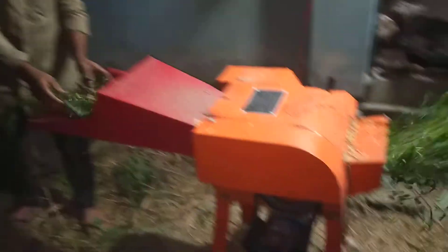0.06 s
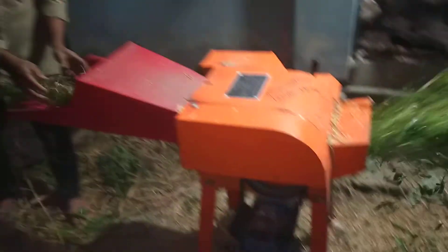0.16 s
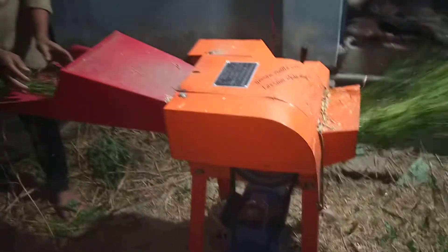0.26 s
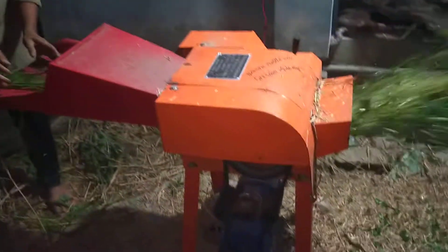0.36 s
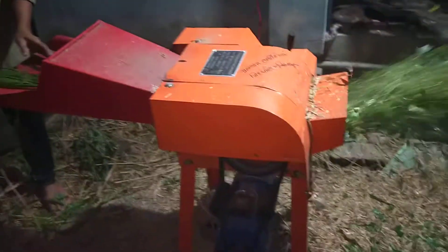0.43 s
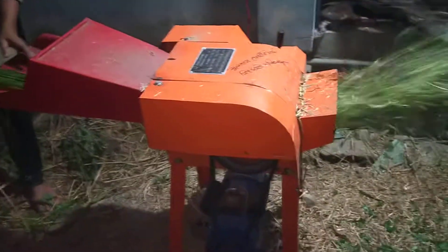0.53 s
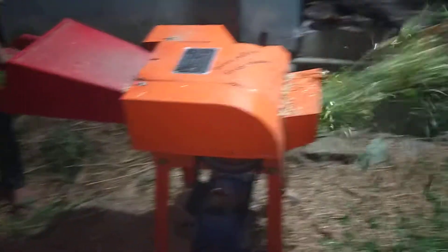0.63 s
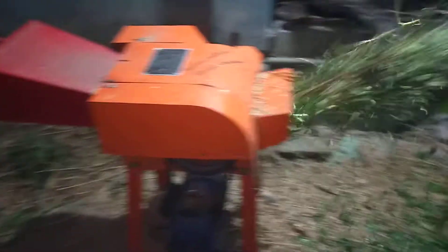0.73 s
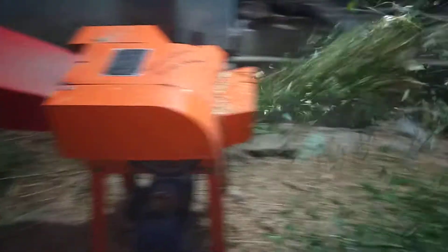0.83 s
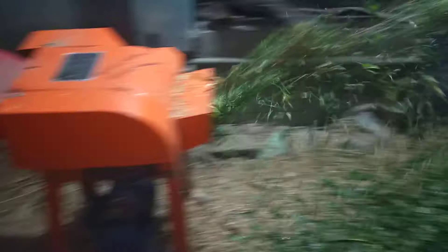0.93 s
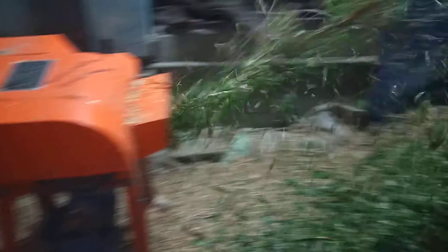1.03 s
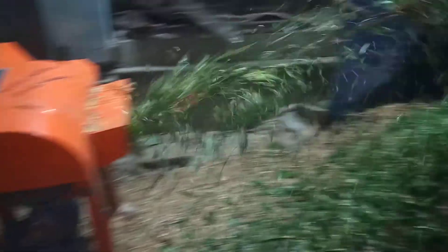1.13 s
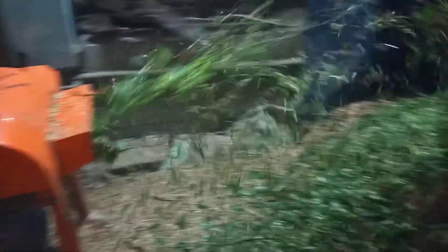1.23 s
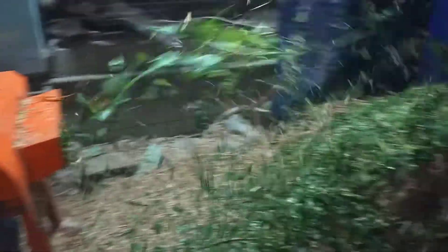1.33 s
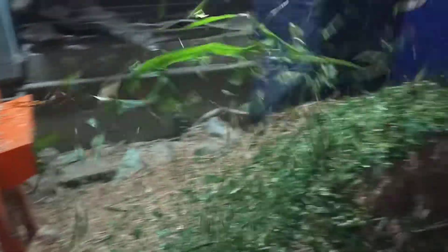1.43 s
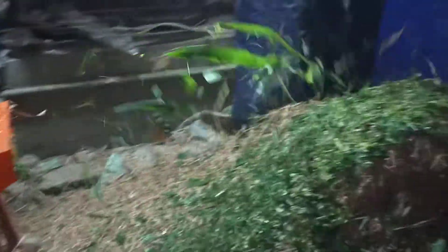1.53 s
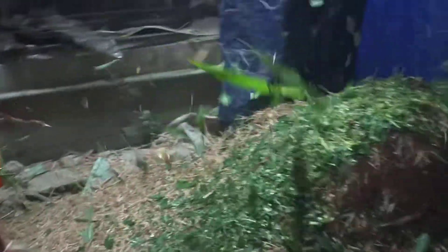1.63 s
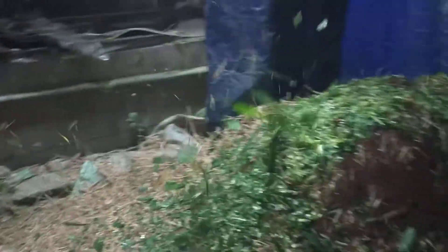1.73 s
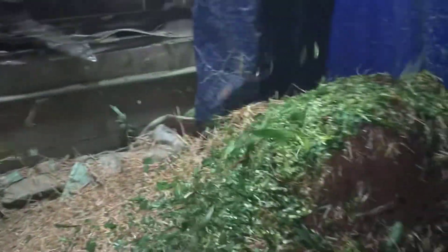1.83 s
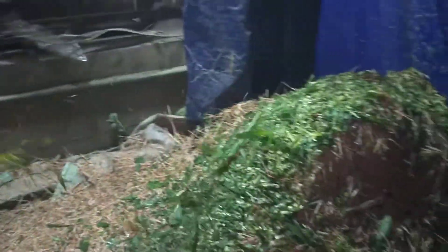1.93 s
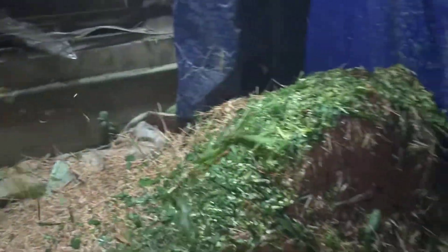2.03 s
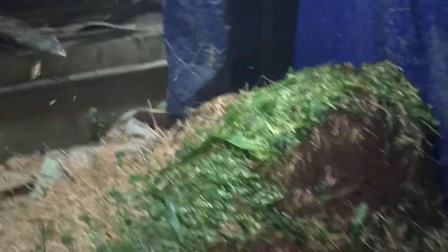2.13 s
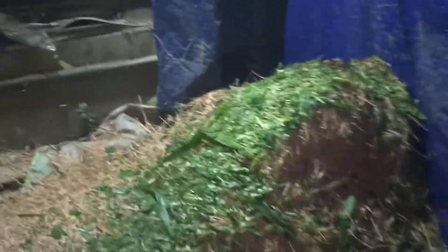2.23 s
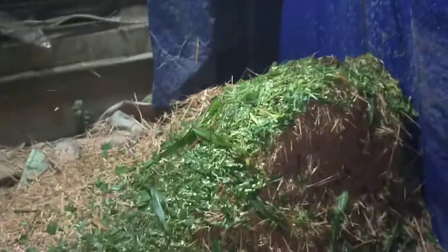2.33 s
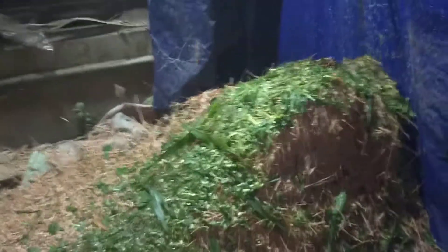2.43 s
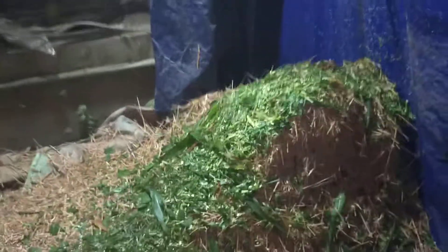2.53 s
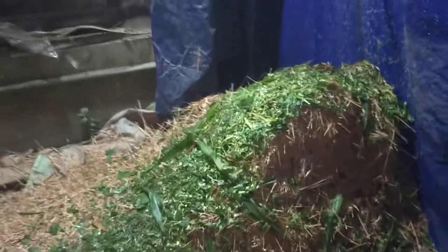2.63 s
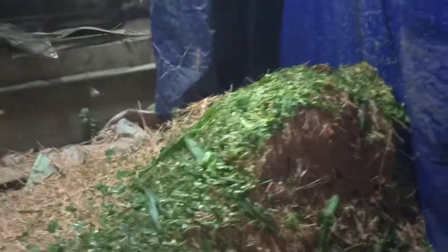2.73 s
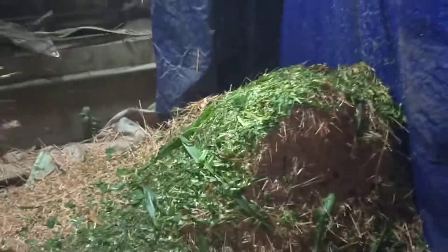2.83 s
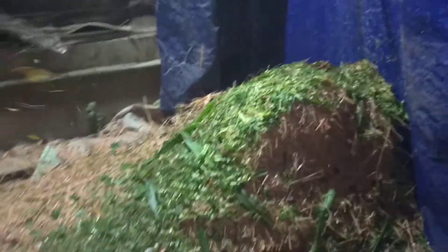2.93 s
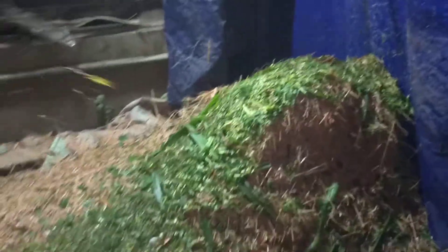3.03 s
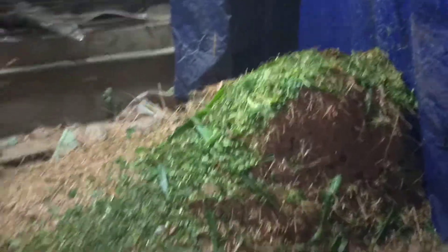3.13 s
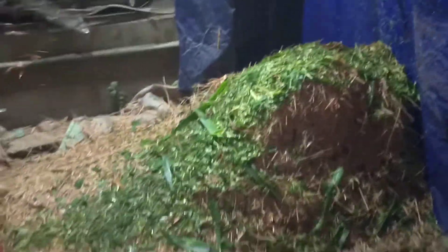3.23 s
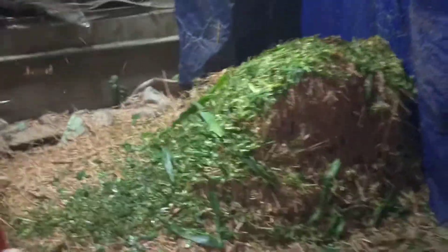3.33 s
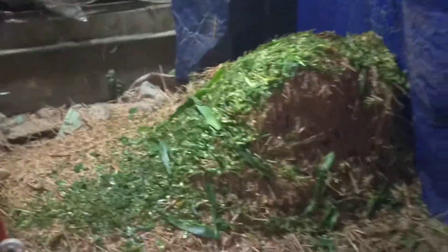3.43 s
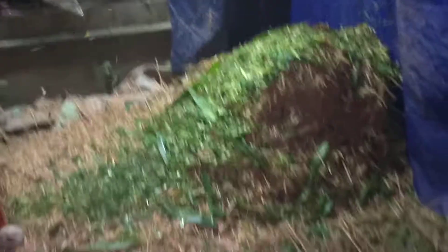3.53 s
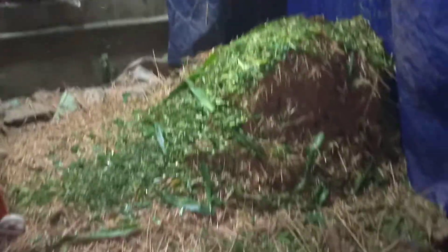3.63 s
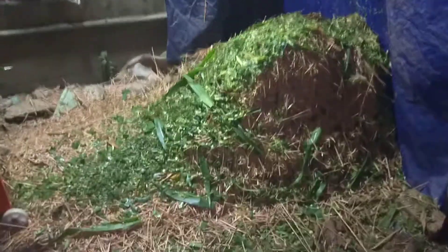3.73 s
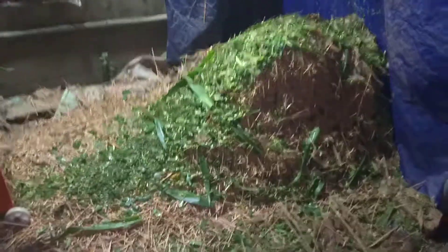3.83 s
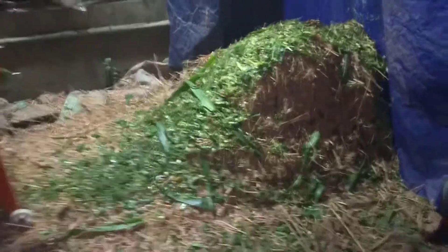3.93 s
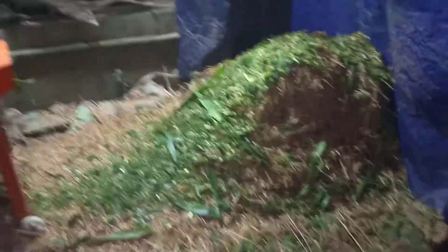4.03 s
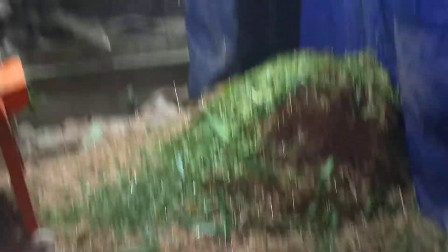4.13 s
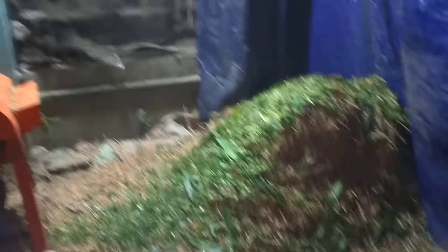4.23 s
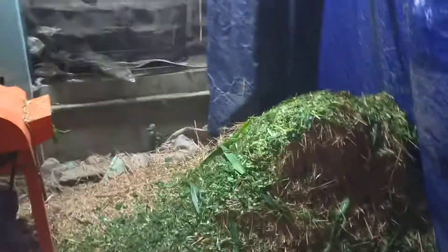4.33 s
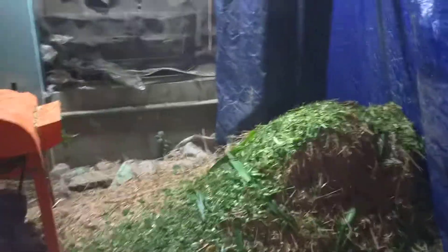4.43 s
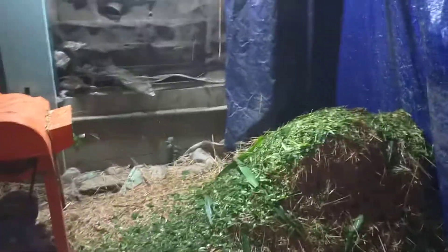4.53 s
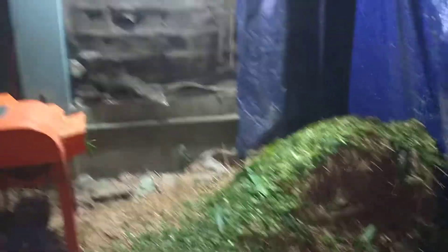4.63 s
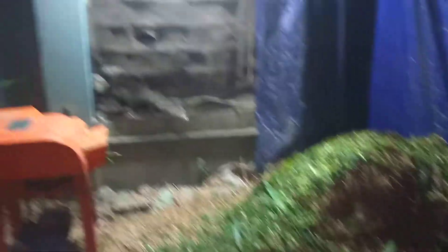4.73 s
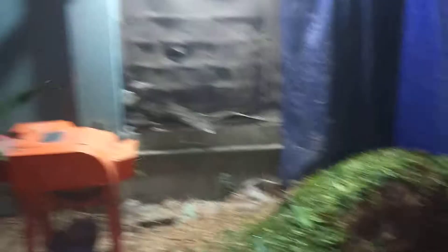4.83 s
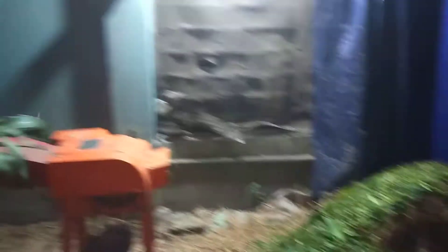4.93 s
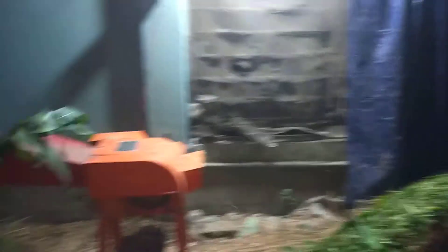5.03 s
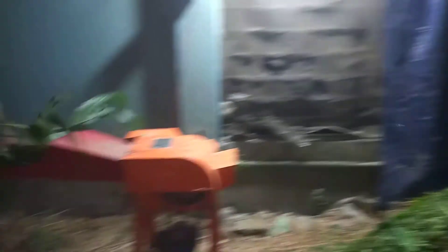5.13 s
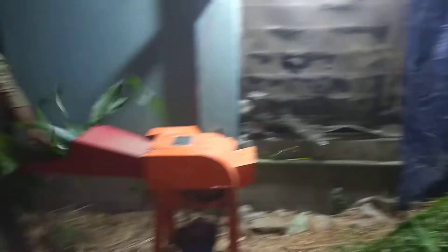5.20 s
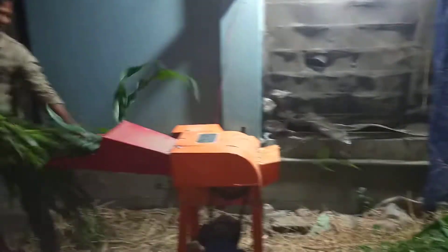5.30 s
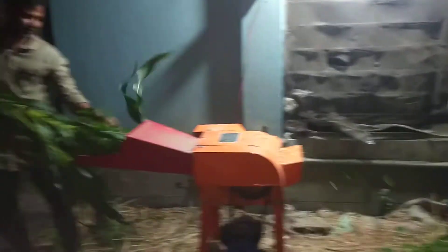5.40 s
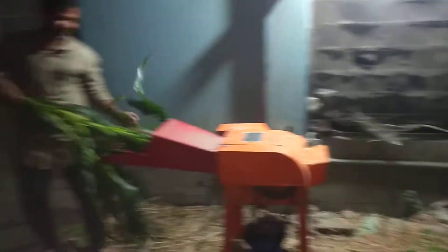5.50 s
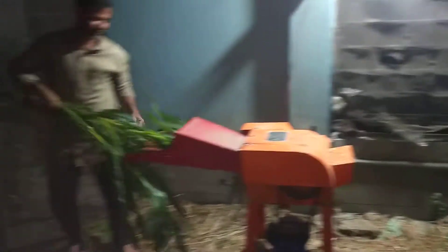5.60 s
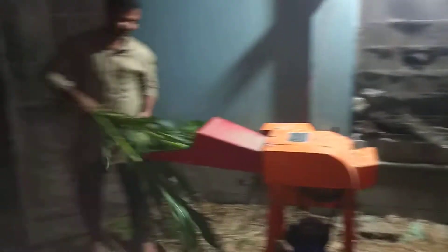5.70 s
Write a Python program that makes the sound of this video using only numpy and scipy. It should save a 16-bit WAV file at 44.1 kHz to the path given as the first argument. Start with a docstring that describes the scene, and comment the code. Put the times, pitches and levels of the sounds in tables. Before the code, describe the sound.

In a farm shed, an electric chaff cutter chops the end of a bundle of green fodder with a loud, droning buzz, crunching stalks and hissing chaff. After about a second the drum runs empty and slightly faster, churning air with a hollow whir and a faint whine. Loose steel parts rattle rapidly, with scattered pings and sharp cracks. The machine fades a little as the microphone moves away.

```python
"""A farm shed, where an electric chaff cutter's four-bladed drum chops the end of a bundle of green fodder.
The blows buzz in the sheet-steel hood, stalks crunch and chaff sprays out of the chute.
After a second the drum runs empty, a little faster, churning air while loose steel parts rattle once a turn.
Hard bits ping, sharp cracks top hard rattles, and the machine grows fainter as the listener steps away."""
import sys
import numpy as np
from scipy import signal
from scipy.fft import rfft, irfft
from scipy.io import wavfile
from scipy.ndimage import uniform_filter1d

SR = 44100
rng = np.random.default_rng(int(sys.argv[2]) if len(sys.argv) > 2 else 0)


def transcribe(signal):
    """Save signal, clipped to [-1, 1], as a 16-bit WAV file at the path in sys.argv[1]."""
    frames = np.atleast_2d(signal).T
    limited = np.clip(frames, -1, 1)
    pcm = np.round(limited * 32767).astype(np.int16)
    wavfile.write(sys.argv[1], SR, pcm)


N = 254016
TIME = np.arange(N) / SR
BLADES = 4
SHED_T60_S = 0.29
FADE_DB_PER_S = 0.8  # air and rattles recede as the listener steps away

# Resonances of the steel parts. Each row: centre in Hz, width in Hz, boost in dB.
STEEL_PEAKS = [(1154, 37, 3), (1657, 100.6, 5), (2224, 210, 4), (2630, 62, 2), (4050, 270, -5),
               (5600, 160, 4.5), (6730, 48, 10), (7220, 160, 10), (8360, 600, 7.5)]
# Tone of the rattles' bright edge. Each row: frequency in Hz, gain in dB.
EDGE_EQ = [(1500, -7.5), (3500, 12.5), (5000, 1.5), (6200, -4), (7300, 2), (8600, 4), (9400, -5.5),
           (12000, -12), (13000, -4), (14200, -3), (15600, 1.5)]


def chopping(blade):
    """Blades shear the bundle: the bite buzzes and thuds in a droning hood, stalks crunch, chaff sprays."""
    # The bundle in the drum. Each row: time in seconds, force of the bite in dB, flow of fodder in dB.
    feed = [(0, 1, 2), (.2, 0.5, 0.5), (.35, -1.5, 0), (.5, -2.5, 0.5), (.66, 1, -0.5), (.77, -9, 0.5),
            (.84, -16, -2), (.95, -24, -7), (1.07, -48, -13.5), (1.15, -56, -10.5), (1.21, -19, -7.5),
            (1.33, -39, -13.5), (1.5, -55.5, -20.5), (2.0, -57.5, -29.5), (5.76, -57.5, -27.5)]
    # The hood's drone. Each row: time in seconds, then levels in dB at 2, 3 and 4 times the blade rate.
    drone_levels = [(0, -28.5, -24, -20), (.15, -32.5, -29, -21.5), (.32, -39, -29.5, -26),
                    (.39, -38.5, -34, -26), (.45, -40, -32, -29.5), (.54, -44, -32, -26.5),
                    (.59, -43, -34, -22), (.68, -39.5, -45, -20.5), (.765, -69, -44, -25),
                    (.8, -63, -50, -40), (.83, -66, -51, -28.5), (.95, -72, -50, -45),
                    (1.1, -79.5, -80, -80)]
    # Tone of the hood's buzz, the thuds, the stalks and the chaff. Each row: frequency in Hz, gain in dB.
    buzz_eq = [(40, -40), (80, -39.5), (165, -24.5), (240, -13), (322, -16.5), (400, -6.5), (482, -6.5),
               (563, -9.5), (643, -8.5), (724, -11.5), (800, -15.5), (880, -13), (1150, -23.5), (1500, -23),
               (2200, -31.5), (7000, -66)]
    thud_eq = [(40, -41), (70, -49), (120, -22), (190, -8.5), (255, -3), (305, 3.5), (390, -0.5),
               (460, -6.5), (700, -13.5), (1100, -25.5), (2500, -52)]
    crunch_eq = [(50, -36), (300, -31), (550, -5), (880, 5), (1100, 2), (1400, -2), (1900, -2), (2350, -3),
                 (3000, -9.5), (4000, -18), (6000, -25), (12000, -26.5)]
    spray_eq = [(2000, -16), (3500, 3), (5200, -1.5), (6300, 3.5), (7700, 2.5), (8600, 5), (10000, -3),
                (12000, -13), (14000, -3), (15600, 2.5)]
    bite_db, flow_db = curves(feed)
    blows = colour(cuts(blade, uneven_db=0.5, scatter_db=0.5), buzz_eq)
    buzz = unit(bending(blows, delay_s=0.028, at_hz=320)) * undb(-27 + bite_db)
    drone = tones(blade, enumerate(curves(drone_levels), 2), waver_db=1.1, slip_rad=0.05)
    thick_db = 3 * swell(0.65, half_s=0.098)  # a thick part of the bundle goes through
    pounding = rng.standard_normal(N) * strokes(blade, decay_cycles=1.65, scatter_db=0.5)
    thud = colour(pounding, thud_eq) * undb(-26 + 0.36 * bite_db + thick_db)
    stalks = clicks(6000, spread_db=2) * strokes(blade, decay_cycles=9.1, scatter_db=0.85)
    crunch = reverb(colour(stalks, crunch_eq, STEEL_PEAKS), wet_db=-10.5) * undb(-30.5 + flow_db)
    chaff = clicks(9000, spread_db=2.5) * strokes(blade, decay_cycles=4.2, scatter_db=2)
    spray = reverb(colour(chaff, spray_eq), wet_db=-8) * undb(-41.5 + flow_db)
    return buzz + drone + thud + crunch + spray


def cuts(blade, uneven_db, scatter_db):
    """One sharp push per blade pass; one side of the drum bites harder, and no two cuts are alike."""
    at = np.flatnonzero(np.diff(blade.astype(int)))
    lopsided_db = uneven_db * np.cos(2 * np.pi * blade[at] / BLADES)
    pushes = np.zeros(N)
    pushes[at] = undb(lopsided_db + scatter_db * rng.standard_normal(len(at)))
    return pushes


def bending(x, delay_s, at_hz):
    """Bending waves in sheet steel: the lows travel slower than the highs, which smears each blow."""
    f = np.fft.rfftfreq(N, 1 / SR)
    return irfft(rfft(x) * np.exp(-4j * np.pi * delay_s * np.sqrt(at_hz * f)), N)


def churned_air(blade):
    """The blades churn air in the hood: a pattern that repeats every turn, under random turbulence."""
    # The hood's hollow note as the moving listener hears it. Each row: time in seconds, pitch in Hz.
    hood_note = [(0, 326), (2.6, 326), (3.3, 349), (3.75, 373), (4.1, 304), (4.4, 397), (4.85, 386.7),
                 (5.2, 341), (5.76, 303)]
    # Tone of the air with that note at 340 Hz. Each row: frequency in Hz, gain in dB.
    air_eq = [(30, -85), (60, -79), (90, -22), (130, -19.5), (200, -8.5), (265, -4.5), (345, 1.5),
              (430, -5.5), (560, -13.5), (750, -20.5), (1500, -20.5), (5000, -47)]
    hood_hz, = curves(hood_note)
    surge_db, _ = surges()
    one_turn = rng.standard_normal(SR // 21)
    repeating = one_turn[(blade / BLADES % 1 * len(one_turn)).astype(int)]
    turbulence = undb(6) * rng.standard_normal(N)
    churn = (repeating + turbulence) * strokes(blade, decay_cycles=2.1, scatter_db=1.1)
    # Crossfading three transposed EQs makes the note slide.
    notes_hz = [290, 340, 400]
    air = sum(np.interp(hood_hz, notes_hz, share) * colour(churn, np.array(air_eq) * [hz / 340, 1])
              for hz, share in zip(notes_hz, np.eye(3)))
    return unit(air) * undb(-39 - FADE_DB_PER_S * TIME + surge_db)


def drum_tones(blade):
    """The spinning drum hums and whines, loudest in front of the chute."""
    # Partials of the hum and the whine. Each row: multiple of the blade rate, relative level in dB.
    hum_partials = [(2.94, -54), (3.5, -51), (4, -55), (4.19, -52.5), (5, -57.5), (8, -63)]
    whine_partials = [(7, -1), (7.27, -6.5)]
    # Their fader rides. Each row: time in seconds, gain in dB.
    hum_fader = [(0, 8), (.7, 8), (.85, 13.5), (.97, 8), (1.08, 4.5), (1.9, 1.5), (2.4, 6), (2.8, 4),
                 (3.3, -1.5), (5.76, -9.5)]
    whine_fader = [(0, -64), (.7, -50), (.8, -45), (.97, -43), (1.1, -49), (1.25, -48), (1.6, -53.5),
                   (2.1, -58), (2.28, -53), (2.45, -56), (2.65, -53), (3.2, -61), (5.76, -69)]
    hum = tones(blade, hum_partials, waver_db=2, slip_rad=0.35) * undb(curves(hum_fader)[0])
    whine = tones(blade, whine_partials, waver_db=3.5, slip_rad=0.58) * undb(curves(whine_fader)[0])
    return hum + whine


def drive(turn):
    """The drive's loose steel parts rattle in clusters of clicks that ring their modes and shake chaff."""
    # Tone of the rattles' dull body. Each row: frequency in Hz, gain in dB.
    body_eq = [(50, -65), (300, -13.5), (600, 0), (760, -1), (950, 4), (1350, -1.5), (1900, 2.5), (2350, 3),
               (2800, -1.5), (3200, -5.5), (4000, -14), (5000, -20.5), (8000, -30), (12000, -47)]
    # Modes of the loose parts. Each row: frequency in Hz, relative level in dB.
    modes = [(1130, 2), (1660, 5.5), (1960, 7), (2080, 1.5), (2240, 5.5), (2690, -2), (2760, 3), (4080, -8),
             (6630, -10.5), (7100, -12), (8100, -11), (8450, -12)]
    # One part jingles along for a while. Each row: crest and half length in seconds, pitch in Hz, gain in dB.
    jingles = [(2.76, 0.12, 2480, -8), (4.3, 0.11, 2410, -7), (4.745, 0.4, 4045, -19),
               (5.15, .08, 2780, -10), (5.393, 0.035, 2260, -4)]
    body, edge = rattle_envelopes(turn)
    low = colour(clicks(5000, spread_db=2.5) * body, body_eq, STEEL_PEAKS)
    high = colour(clicks(3500, spread_db=4.5) * edge, EDGE_EQ, STEEL_PEAKS) * undb(-1)
    chaff = chaff_ticks() * edge * undb(-7.5)
    # Each mode is struck at its own moments, so no two rattles have the same colour.
    ringing = sum(undb(db - 18) * struck(clicks(160, spread_db=2.5) * body, hz, t60=0.067)
                  for hz, db in modes)
    jingle = sum(undb(db) * struck(clicks(300, spread_db=3.5) * body * swell(s, half_s), hz, t60=0.054)
                 for s, half_s, hz, db in jingles)
    return reverb(low, wet_db=-6.5) + reverb(high, wet_db=-4.5, t60=0.03) + ringing + jingle + chaff


def rattle_envelopes(turn, at_turn=0.36, stray_turns=0.18, scatter_db=3):
    """Envelopes of the drive's dull body and bright edge: chatter, a rattle each turn, some hard ones."""
    # Hard rattles that stand out. Each row: time in seconds, relative levels of edge and body in dB.
    hard_rattles = [(1.111, -46.5, -37), (1.196, -41, -38), (1.251, -43, -37), (1.332, -51, -39),
                    (1.433, -47, -46), (1.543, -49, -42), (1.585, -47, -46), (1.622, -51, -52),
                    (1.73, -59, -42), (1.926, -53, -41), (1.975, -52, -43), (2.117, -51.5, -36),
                    (2.213, -44, -34), (2.303, -52, -38), (2.34, -49.5, -39), (2.398, -58, -41),
                    (2.486, -51, -36.5), (2.548, -49, -36.5), (2.606, -51, -37), (2.684, -49, -35.5),
                    (2.742, -49.5, -39), (2.775, -55, -42), (2.832, -49, -42), (2.877, -49, -37.5),
                    (2.974, -50.5, -38.0), (3.079, -51, -39), (3.114, -47.5, -39), (3.198, -53, -37),
                    (3.3, -60, -41.5), (3.345, -53, -43), (3.436, -51, -40), (3.509, -53.0, -38.5),
                    (3.551, -53, -40), (3.641, -50.5, -41.5), (3.706, -45, -34), (3.743, -47, -39),
                    (3.779, -57, -39), (3.828, -54, -44), (3.931, -49, -40), (3.976, -54, -46),
                    (4.078, -47.5, -41), (4.121, -49, -39), (4.163, -53, -37), (4.205, -52, -41),
                    (4.532, -51, -40.5), (4.597, -50, -44.5), (4.683, -53.0, -43), (4.731, -54, -46),
                    (4.794, -54, -40.5), (4.854, -57, -40.5), (4.93, -54, -45), (5.074, -50, -38),
                    (5.171, -50.5, -46), (5.405, -54, -41), (5.452, -49, -46), (5.528, -49, -40),
                    (5.643, -52, -52), (5.725, -46, -42)]
    _, surge_db = surges()
    shake_db = surge_db - FADE_DB_PER_S * TIME + wander(14)
    stray, strength = rng.standard_normal((int(turn[-1]), 2)).T
    rattle_s = np.interp(np.arange(len(stray)) + at_turn + stray_turns * stray, turn, TIME)
    rattles = bursts(rattle_s, scatter_db * np.minimum(strength, 1))
    chatter = strokes(turn + 1 - at_turn, decay_cycles=1.8, scatter_db=0.7) ** 2
    # The layers add as powers.
    body = chatter * undb(-45 + shake_db) ** 2 + rattles * undb(-37.5 + shake_db) ** 2
    edge = chatter * undb(-57.5 + shake_db) ** 2 + rattles * undb(-47 + shake_db) ** 2
    hard_s, edge_db, body_db = np.transpose(hard_rattles)
    body += bursts(hard_s, body_db + 3)
    edge += bursts(hard_s, edge_db + 4.5, rise_s=0.003)  # a sharper attack than the body's
    return np.sqrt(body), np.sqrt(edge)


def surges():
    """The empty machine shakes harder or eases off for a moment: gains in dB for air and drive."""
    # Swells and lulls. Each row: crest and half length in seconds, gains of air and drive in dB.
    swings = [(1.39, .02, 1.5, -8), (1.47, 0.018, 1, -5), (1.8, .012, -3, -4), (2.01, 0.014, 0, -7),
              (2.17, .035, -3.5, -4.5), (2.394, 0.14, 2, 2.5), (2.45, 0.029, -1.5, -7.5),
              (2.673, .012, -3, -6), (2.719, 0.084, 4, 4), (3.16, 0.018, 2.5, -8), (3.245, 0.028, -1.5, -7),
              (3.408, 0.025, -4, -6), (3.68, .012, 2, -9), (3.75, 0.063, 6, 4.5), (4.173, 0.035, 3, -1),
              (4.278, 0.026, -4, 1), (4.466, 0.041, -1.5, -3), (4.814, 0.062, 0.5, -1.5),
              (4.915, .012, -1, -6), (4.981, 0.05, 6, 2.5), (5.048, 0.028, 1.5, -11), (5.244, 0.019, 1, -7),
              (5.489, 0.016, -1, -3), (5.69, 0.019, 0, -6)]
    return sum(np.outer(gains_db, swell(s, half_s)) for s, half_s, *gains_db in swings)


def clinks():
    """Single hard bits each set a close, beating pair of the steel's modes ringing."""
    # Hits on the steel. Each row: start in seconds, pitch in Hz, peak of the main mode in dB.
    hits = [(0.79, 2630, -31), (1.194, 2006, -34.5), (1.284, 2240, -35), (1.289, 3290, -43),
            (1.297, 1720, -39), (1.333, 1980, -36.5), (2.219, 1986, -36), (2.22, 6990, -47),
            (2.311, 7105, -52), (2.549, 2756, -43), (2.684, 3544, -50), (2.69, 3300, -51),
            (3.742, 2780, -39), (3.746, 3850, -49), (3.786, 2700, -42), (4.122, 2700, -48),
            (4.315, 4100, -53), (4.598, 4090, -54), (4.681, 4110, -53), (4.735, 4170, -55),
            (4.765, 4070, -55), (4.796, 3350, -50)]
    out = np.zeros(N + SR)
    for s, hz, db in hits:
        partner = undb(-9) * ring(hz + rng.uniform(-61, 70), t60=0.071)
        ping = undb(db) * (ring(hz, t60=0.088) + partner)
        out[int(s * SR):][:len(ping)] += ping
    return out[:N]


def sharp_cracks():
    """Short, bright cracks, most at the start of a hard rattle."""
    # The cracks. Each row: time in seconds, relative level in dB.
    cracks = [(1.186, -38), (1.548, -46), (2.215, -47), (2.684, -44), (2.724, -44), (2.752, -50),
              (2.779, -42.5), (2.838, -48), (3.021, -45.5), (3.114, -48), (3.199, -49), (3.699, -42.5),
              (3.716, -46), (3.746, -42), (3.762, -50), (3.834, -45), (3.982, -46), (4.085, -48),
              (4.168, -49), (4.535, -48), (4.603, -46), (4.735, -48), (4.934, -43), (5.072, -51),
              (5.319, -48), (5.726, -49)]
    # Tone of a crack. Each row: frequency in Hz, gain in dB.
    crack_eq = [(1500, -10), (2800, -1), (4500, -4), (6000, -5), (8500, 0), (11800, -15), (13200, -8),
                (15600, 0.5)]
    envelope = np.sqrt(bursts(*np.transpose(cracks), rise_s=0.002, fall_s=0.01))
    return colour(clicks(7000, spread_db=3) * envelope, crack_eq)


def chaff_ticks(per_s=900, low_hz=5714, high_hz=15200, t60=0.025, scatter_db=2.5):
    """Bits of chaff shower against the steel, each ringing briefly at its own pitch; rms 1."""
    out = np.zeros(N + SR)
    age = TIME[:SR // 25]
    decay = undb(-60 * age / t60)
    for when, pitch, size in rng.random((int(per_s * N / SR), 3)):
        hz = low_hz * (high_hz / low_hz) ** pitch
        strength = undb(-scatter_db * np.log(max(size, 0.05)))
        out[int(when * N):][:len(age)] += strength * np.sin(2 * np.pi * hz * age) * decay
    return unit(colour(out[:N], EDGE_EQ))


def reverb(x, wet_db, t60=SHED_T60_S):
    """Direct sound and a dense tail: short inside the hood, longer off the shed's walls."""
    t = TIME[:SR // 2]
    tail = rng.standard_normal(len(t)) * undb(-60 * t / t60)
    response = undb(wet_db) * tail / np.linalg.norm(tail)
    response[0] = 1
    return convolve(x, response)


def strokes(phase, decay_cycles, scatter_db):
    """An envelope that jumps at each new cycle, to a strength of its own, and then sags."""
    cycle = phase.astype(int)
    strength = undb(scatter_db * rng.standard_normal(cycle.max() + 1))
    return unit(np.exp(-(phase % 1) / decay_cycles) * strength[cycle])


def tones(phase, partials, waver_db, slip_rad):
    """Multiples of a rotation, each wavering in strength and timing."""
    out = np.zeros(N)
    for multiple, db in partials:
        amplitude = np.sqrt(2) * undb(db + waver_db * wander(22.39))
        out += amplitude * np.sin(2 * np.pi * (multiple * phase + rng.random()) + slip_rad * wander(14))
    return out


def clicks(per_s, spread_db):
    """Tiny impacts at random moments, a few much harder than the rest."""
    hit = rng.random(N) < per_s / SR
    polarity = rng.choice([-1, 1], N)
    return unit(hit * polarity * undb(spread_db * np.minimum(rng.exponential(size=N), 4)))


def bursts(times, levels_db, rise_s=0.007, fall_s=0.013):
    """Power envelope of click clusters, each building up smoothly around its time and dying away."""
    lead = SR // 20
    age = TIME[:SR // 4] - lead / SR
    attack = (1 + np.tanh((age - rise_s / 2) / rise_s)) / 2
    shape = attack * np.exp(-np.maximum(age, 0) / fall_s)
    power = np.zeros(N + SR)
    for s, db in zip(times, levels_db):
        power[max(int(s * SR), 0):][:len(shape)] += (undb(db) * shape) ** 2
    return power[lead:lead + N]


def struck(force, hz, t60):
    """One mode rung by a train of clicks."""
    return convolve(force, ring(hz, t60))


def ring(hz, t60):
    """One decaying mode."""
    t = TIME[:SR // 4]
    return np.sin(2 * np.pi * hz * t) * undb(-60 * t / t60)


def colour(x, eq, peaks=()):
    """A smooth EQ curve with narrow resonances on top."""
    size = 8192
    f = np.fft.rfftfreq(size, 1 / SR) + 1
    hz, db = np.transpose(eq)
    curve_db = np.interp(np.log(f), np.log(hz), db)
    curve_db += sum(boost / (1 + (2 * (f - centre) / width) ** 2) for centre, width, boost in peaks)
    # Folding the cepstrum gives minimum phase: nothing rings ahead of a hit.
    cepstrum = irfft(np.log(undb(curve_db)))
    cepstrum[1:size // 2] *= 2
    cepstrum[size // 2 + 1:] = 0
    return convolve(x, irfft(np.exp(rfft(cepstrum))))


def convolve(x, response):
    """Apply an impulse response, scaled to keep the power of white noise."""
    return signal.fftconvolve(x, response / np.linalg.norm(response))[:N]


def wander(rate_hz):
    """Smooth random drift with a spread near 1."""
    hold = int(SR / rate_hz)
    steps = np.repeat(rng.standard_normal(N // hold + 1), hold)
    return 1.3 * uniform_filter1d(uniform_filter1d(steps, hold), hold)[:N]


def swell(crest_s, half_s):
    """A bell-shaped envelope."""
    return np.exp(-((TIME - crest_s) / half_s) ** 2)


def curves(table):
    """The columns of a timed table, sample by sample."""
    s, *columns = np.transpose(table)
    return [np.interp(TIME, s, column) for column in columns]


def undb(db):
    """Decibels to gain."""
    return 10 ** (np.asarray(db) / 20)


def unit(x):
    """Scale to rms 1."""
    return x / np.sqrt(np.mean(x ** 2))


def scene():
    """One drum speed times the cuts, the air, the tones and the drive; clinks and cracks fall on top."""
    # Drum speed. Each row: time in seconds, blade passes per second.
    speed = [(0, 80.98), (.3, 80.48), (.6, 79.65), (.73, 79.62), (.82, 82.5), (.95, 82.76), (1.4, 83.7),
             (5.76, 83.8)]
    blade_hz, = curves(speed)
    blade = np.cumsum(blade_hz) / SR  # phase, counted in blade passes
    machine = chopping(blade) + churned_air(blade) + drum_tones(blade) + drive(blade / BLADES)
    return (machine + clinks() + sharp_cracks())[None]


def record(dry):
    """A gentle low cut thins the deepest bass; a steep high cut takes off the top."""
    thinned = signal.sosfilt(signal.butter(2, 50, "high", fs=SR, output="sos"), dry)
    return signal.sosfilt(signal.ellip(12, 0.2, 80, 15800, fs=SR, output="sos"), thinned)


dry = scene()
out = record(dry)
transcribe(out)
```